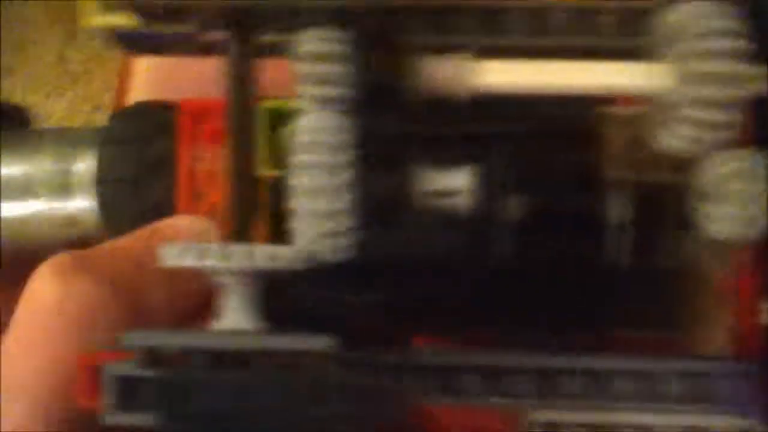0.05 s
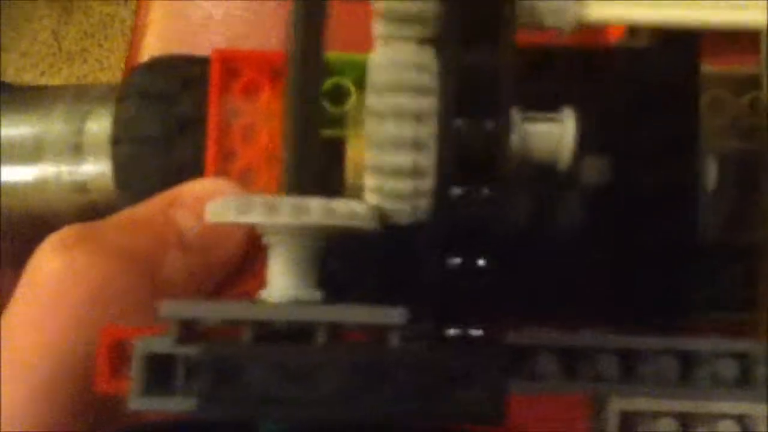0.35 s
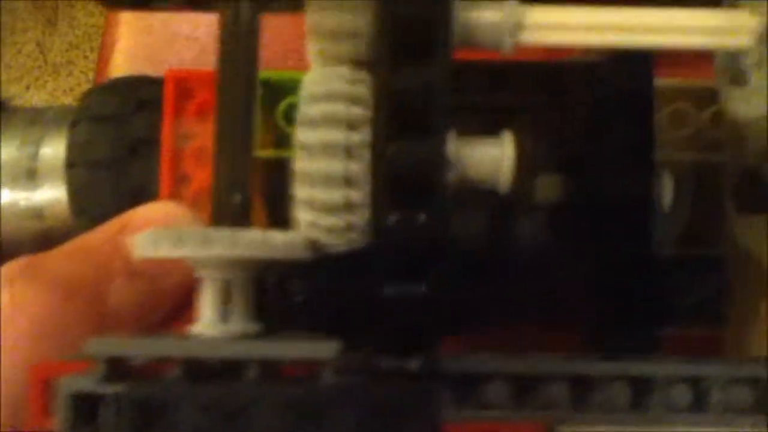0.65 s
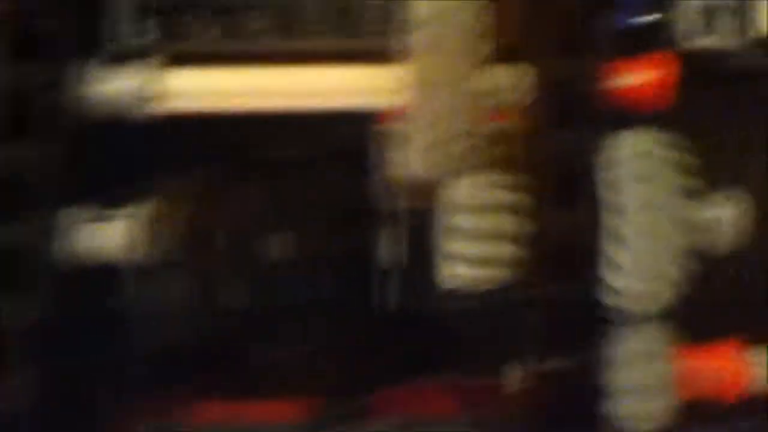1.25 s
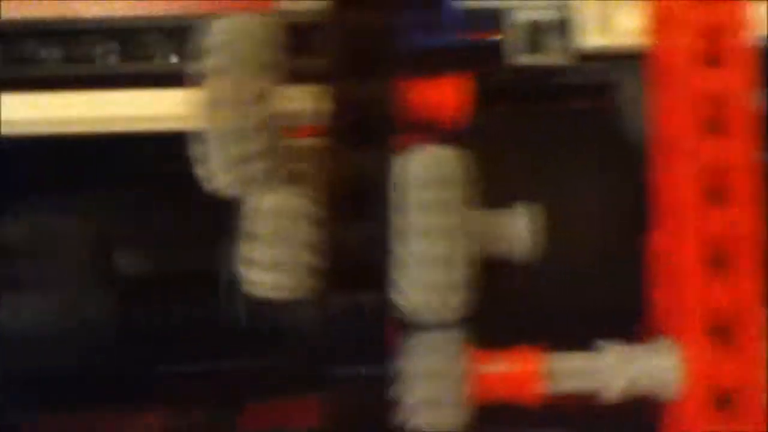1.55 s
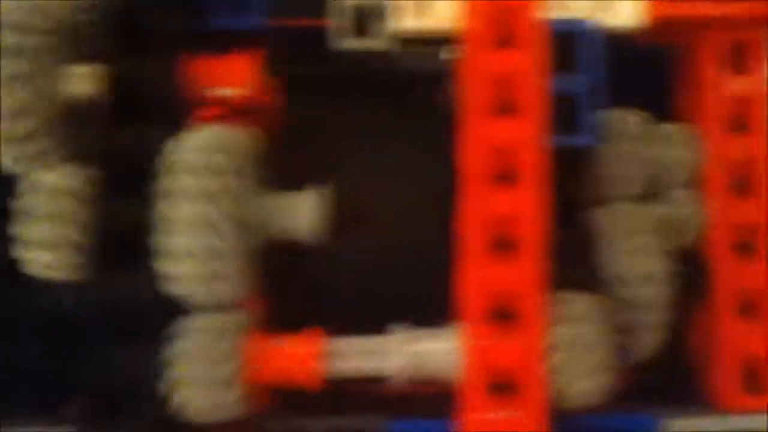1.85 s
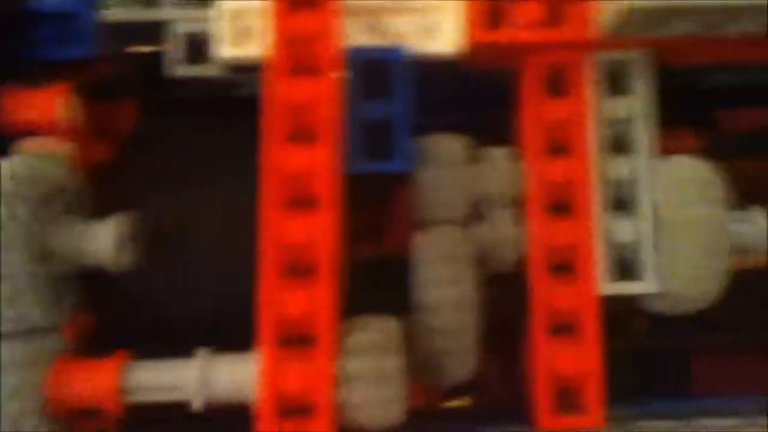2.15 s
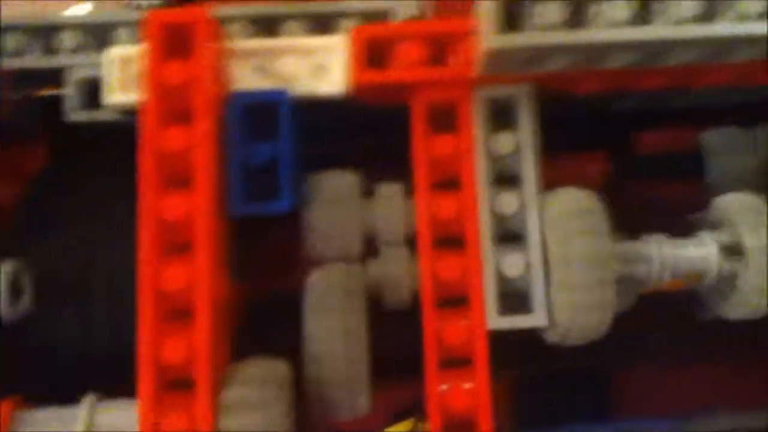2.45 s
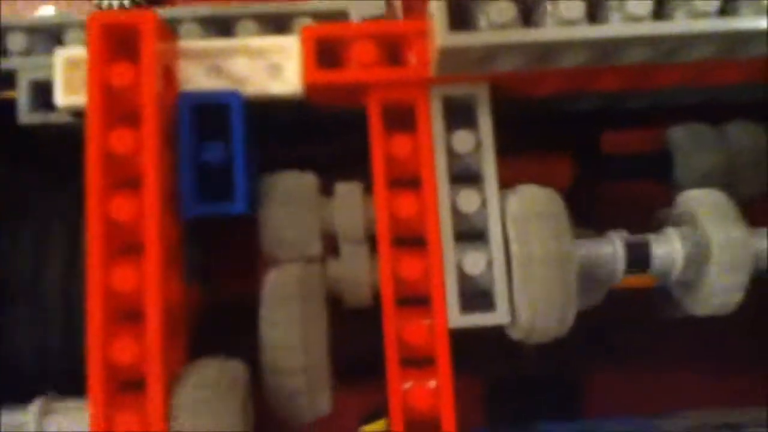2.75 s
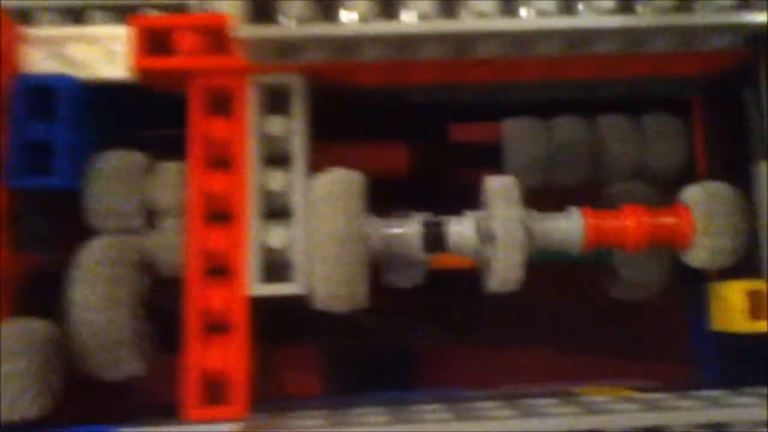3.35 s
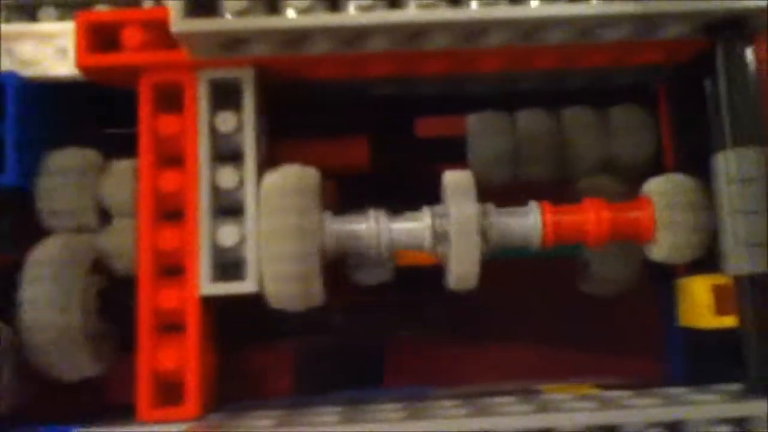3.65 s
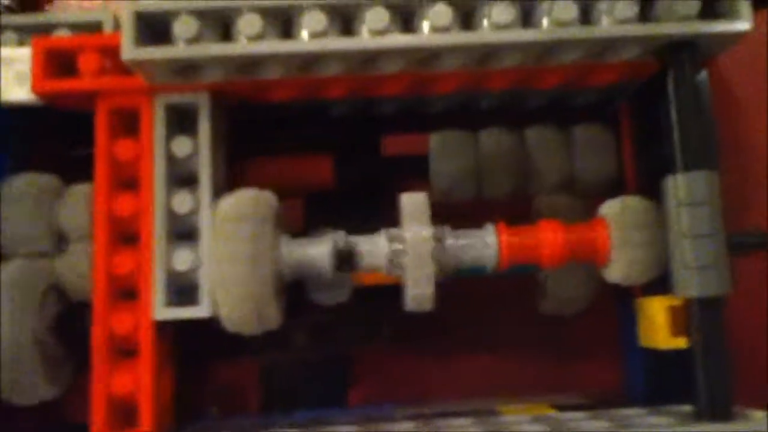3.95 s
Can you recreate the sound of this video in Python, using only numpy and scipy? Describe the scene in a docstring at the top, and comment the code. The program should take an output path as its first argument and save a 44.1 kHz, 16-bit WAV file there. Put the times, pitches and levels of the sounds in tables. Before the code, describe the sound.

A small plastic engine powered by suction clatters rapidly throughout, mixing throbbing, rushing air, bright hiss and gear chatter with an occasional skipped tooth. Heard close in a small room, it swells as the microphone travels from intake to gears.

```python
"""Toy brick vacuum engine

A vacuum-driven engine of plastic bricks spins about 24 times a second and turns a train of gears.
Each turn brings an air thump, two gulps of rushing air and a few piston knocks; gear teeth click,
ring and sometimes skip over the suction hiss. The microphone travels along the chassis from the
intake to the gearbox, and the roar grows louder and fuller."""
import sys
import numpy as np
from scipy import signal
from scipy.fft import rfft, irfft
from scipy.io import wavfile
from scipy.ndimage import uniform_filter1d, minimum_filter1d

SR = 44100
rng = np.random.default_rng(int(sys.argv[2]) if len(sys.argv) > 2 else 0)


def pcm_store(signal):
    """Save signal as 16-bit PCM."""
    levels = np.round(np.clip(np.atleast_2d(signal), -1, 1) * 32767)
    wavfile.write(sys.argv[1], SR, levels.astype(np.int16).T)


N = 176400
T = np.arange(N) / SR


# The gulps of air in one turn. Each row: place in turns, width in turns, strength.
AIR_GULPS = [(.11, 0.085, 0.7), (.62, 0.075, 0.75)]

def airflow(turns, floor=.36, grit=.22):
    """Turbulent air, with a share of rattle as grit, swells above a steady floor at each gulp."""
    gulps = sum(strength * np.exp(-.5 * (((turns - place + .5) % 1 - .5) / width) ** 2)
                for place, width, strength in AIR_GULPS)
    turbulence = np.sqrt(1 - grit) * rng.standard_normal(N) + np.sqrt(grit) * rattle()
    flutter = amp(.5 * drift(rate_hz=6.3))
    return turbulence * np.sqrt(floor + gulps) * flutter


# The roar's EQ at the intake and over the gearbox. Each row: frequency in Hz, gain in dB.
ROAR_INTAKE_EQ = [(25, -28), (70, -6), (160, -0.5), (260, 0), (450, 1), (600, 2), (800, 3.5), (1100, 1),
                  (1420, -4.5), (1800, 0), (2400, -7), (3200, -2.5), (4500, -8.5), (6000, -1), (12000, -21),
                  (15000, -42)]
ROAR_GEARBOX_EQ = [(25, -26), (70, -12), (170, -10.5), (280, -5), (480, -3.5), (740, 0), (1100, -0.5),
                   (1500, 2), (2100, -2), (3100, -2.5), (3700, -5.5), (5250, -10.5), (6100, -9),
                   (7200, -7.5), (12000, -37), (15000, -58)]

def air_roar(turns, travel):
    """Air rushes through the chassis in two gulps a turn."""
    return amp(3) * crossfade_eq(airflow(turns), travel, ROAR_INTAKE_EQ, ROAR_GEARBOX_EQ)


# The hiss's EQ at the intake and over the gearbox. Each row: frequency in Hz, gain in dB.
HISS_INTAKE_EQ = [(100, -18), (1500, -8.5), (3300, -0.5), (3700, -0.5), (4250, 1.5), (5500, 0.5),
                  (6300, -4.5), (7250, -4.5), (7900, -1), (8600, -7.5), (9600, -3.5), (10600, -3),
                  (12400, -9.5), (13000, -18), (14200, -14), (15500, -36)]
HISS_GEARBOX_EQ = [(100, -20), (1500, -5), (3300, -4.5), (3850, -1.5), (4400, -2), (4850, -1), (5400, -2),
                   (6200, -3), (7100, 1), (7950, 0), (8500, -1), (9400, 0), (10450, -7.5), (11300, -4.5),
                   (11950, -5.5), (12900, -21), (14000, -16), (14900, -50)]

def suction_hiss(turns, travel):
    """Suction draws a bright, flickering hiss that barely pulses with the gulps."""
    hiss = crossfade_eq(airflow(turns, floor=23, grit=.35), travel, HISS_INTAKE_EQ, HISS_GEARBOX_EQ)
    return hiss * amp(-.5 + 1.3 * drift(rate_hz=79))


# The piston's blows. Each row: place in turns, accent in dB at the intake and over the gearbox.
PISTON_HITS = [(.03, -8, 0), (.115, -9, 0), (.175, 3, -4), (.215, -3, 2), (.365, 3.5, -7), (.43, 2.5, -1.5),
               (.52, -14, -4), (.675, -9, 1.5)]
# The ring of the bricks along the chassis. Each row: time in seconds, pitch in Hz.
BRICK_RING = [(0, 2300), (.9, 2330), (1.25, 2500), (1.95, 2540), (2.3, 2940), (3.0, 2980), (4, 3060)]

def piston_knocks(turns, travel):
    """Piston and valve hit their stops; the blows and the meshing gears ring the loose bricks."""
    hits, ring_hz = strikes(turns, travel, PISTON_HITS), curve(BRICK_RING)
    body = unit(resonate(hits, ring_hz * (1 + .01 * drift(rate_hz=40)), width_hz=280))
    crack = colour(hits, [(60, -10), (300, -1), (1500, 4), (5500, -13), (11000, -11), (13500, -47)])
    mesh = unit(resonate(airflow(turns, floor=.15, grit=.9), ring_hz, width_hz=220))
    return body + amp(-18) * crack + amp(-7) * travel * mesh


# The tooth clicks. Each row: place in turns, accent in dB at the intake and over the gearbox.
TOOTH_HITS = [(.09, -5, -4), (.18, -1, -1.5), (.55, -4, -1.5), (.62, 1, 1.5), (.69, -8, -6), (.92, -8, -6)]
# The main ring of the teeth. Each row: time in seconds, pitch in Hz, relative level in dB.
TOOTH_RING = [(0, 4750, -6.5), (.8, 4650, -6.5), (1.25, 5250, -6.5), (1.7, 5220, -6), (2.2, 5300, -7),
              (2.8, 5300, -5.5), (3.3, 5370, -9), (4, 5370, -15)]

def gear_chatter(turns, travel):
    """Gear teeth click as the load comes on and sound two bright rings."""
    wander = np.interp(travel, [0, 1], [.04, .008])  # pitch strays less where the gears sit tight
    main = resonate(strikes(turns, travel, TOOTH_HITS),
                    curve(TOOTH_RING) * (1 + wander * drift(rate_hz=20)), width_hz=250)
    upper = resonate(strikes(turns, travel, TOOTH_HITS),
                     7050 * (1 + .5 * wander * drift(rate_hz=21)), width_hz=400)
    return amp(curve(TOOTH_RING, column=2) - 2.5) * unit(main) + amp(-10) * plastic_frame(upper)


# The skipping teeth. Each row: start in seconds, pitch in Hz, level in dB.
TOOTH_SKIPS = [(.351, 5100, -14), (.877, 5400, -12), (1.116, 5630, -13), (1.429, 5240, -19),
               (2.566, 5250, -8), (2.856, 5230, -9), (3.592, 5400, -8)]

def gear_skips(attack_s=.001, t60_s=.025):
    """Now and then a tooth jumps and its gear rings with a short rasp."""
    out, t = np.zeros(N), T[:SR // 10]
    for start, hz, db in TOOTH_SKIPS:
        rasp = unit(uniform_filter1d(rng.standard_normal(len(t)), size=40))
        envelope = np.minimum(t / attack_s, 1) * amp(db - 60 * t / t60_s)
        out[round(start * SR):][:len(t)] += envelope * sine(hz * (1 + .04 * rasp))
    return out


# The thump's harmonics. Each row: multiple of the crank speed, relative level in dB.
THUMP_HARMONICS = [(2, -16.5), (3, -15), (4, -6.5), (5, -4), (6, 1), (7, -13), (8, -14.5), (9, -19.5),
                   (11, -12), (14, -12.5)]

def air_thump(turns, place=.449):
    """One low pressure pulse per turn, where the harmonics of the crank line up."""
    phase = 2 * np.pi * (turns - place)
    return unit(sum(amp(db + .3 * drift(rate_hz=6.2)) * np.cos(multiple * phase)
                    for multiple, db in THUMP_HARMONICS))


# The hollows between the bricks. Each row: pitch in Hz, width in Hz, relative level in dB,
# closest moment in seconds, swell time in seconds.
CAVITY_TONES = [(355, 68, -14.5, 2.8, 3.9), (606, 42, -13.5, 1.4, 3), (738, 62, -11.5, 2.4, 2),
                (837, 39, -13, 3.2, 1.2), (1054, 84, -14.5, 1.6, 2), (1330, 220, -10.5, 3, 1.7),
                (1540, 180, -7.5, 4.1, .35), (1590, 140, -11.5, 1.2, 1.8), (1900, 350, -8.5, .3, 0.82),
                (2570, 280, -9.5, 3.1, 1.2), (3700, 200, -5, 3.9, 0.45), (4276, 200, -10, 1.5, 4.6)]

def cavities(turns):
    """Cavities ring in the air stream, each loudest as the microphone passes it."""
    out = np.zeros(N)
    for hz, width_hz, db, closest_s, swell_s in CAVITY_TONES:
        nearness = np.exp(-.5 * ((T - closest_s) / swell_s) ** 2)
        out += amp(db) * nearness * unit(resonate(airflow(turns), np.full(N, hz), width_hz))
    return out


def rattle(ticks_per_s=1700, spread_db=3.5):
    """Loose gear teeth tick at random and ring the plastic frame."""
    ticks = amp(spread_db * np.minimum(rng.exponential(1, N), 4)) * rng.choice([-1, 1], N)
    return plastic_frame(ticks * (rng.random(N) < ticks_per_s / SR))


def plastic_frame(x):
    """The frame rings briefly after each tick; the result has rms 1."""
    return unit(add_tail(x, t60_s=.052, wet_db=2.5))


# The faint bed of whines. Each row: pitch in Hz, level in dB.
WHINE_TONES = [(1814, -41.5), (3326, -42), (6977, -45)]

def suction_whine(waver_hz=4.12):
    """The suction motor and the air path sing thin, wavering tones."""
    return sum(amp(db) * np.sqrt(2) * sine(hz + waver_hz * drift(rate_hz=7)) for hz, db in WHINE_TONES)


def strikes(turns, travel, pattern, bounce_s=.0013, buzz_t60_s=.01):
    """Blows recur in every turn, a little uneven; each bounces twice and leaves a short buzz."""
    clicks, cycles = np.zeros(N), np.arange(int(turns[-1]) + 1)
    for place, intake_db, gearbox_db in pattern:
        late, force, gap = rng.standard_normal((len(cycles), 3)).T
        start = np.interp(cycles + place + .01 * late, turns, T, right=N)
        for bounce in range(3):
            at = ((start + bounce * bounce_s * np.exp(.5 * gap)) * SR).astype(int)
            at, spread_db = at[at < N], 1.1 * force[at < N]
            accent_db = intake_db + (gearbox_db - intake_db) * travel[at]
            clicks[at] += amp(accent_db + spread_db - 10 * bounce)
    decay = np.exp(-2 * np.log(1000) / (buzz_t60_s * SR))
    buzz = np.sqrt(signal.lfilter([1 - decay], [1, -decay], clicks ** 2)) * rng.standard_normal(N)
    return clicks + amp(-6) * buzz


def amp(db):
    """Decibels to gain."""
    return 10 ** (np.asarray(db) / 20)


def unit(x):
    """Scales to rms 1."""
    return x / np.sqrt(np.mean(x ** 2) + 1e-20)


def sine(hz):
    """A sine that follows the curve hz."""
    return np.sin(2 * np.pi * np.cumsum(hz) / SR)


def curve(rows, column=1):
    """One column of a timed table, at every sample."""
    rows = np.array(rows)
    return np.interp(T, rows[:, 0], rows[:, column])


def drift(rate_hz):
    """Smooth random motion of rms 1."""
    hz = np.fft.rfftfreq(N, 1 / SR)
    return unit(irfft(rfft(rng.standard_normal(N)) / (1 + (hz / rate_hz) ** 4), N))


def colour(x, eq):
    """Shapes x with an EQ of (Hz, dB) points, at rms 1."""
    hz, db = np.transpose(sorted(eq))
    gain = amp(np.interp(np.log(np.fft.rfftfreq(N, 1 / SR) + 1), np.log(hz), db))
    return unit(irfft(rfft(x) * gain, N))


def crossfade_eq(x, travel, intake_eq, gearbox_eq):
    """The colour of the air noise shifts as the microphone moves."""
    return (1 - travel) * colour(x, intake_eq) + travel * colour(x, gearbox_eq)


def resonate(x, hz, width_hz):
    """A steep resonance that follows the curve hz."""
    carrier = np.exp(2j * np.pi * np.cumsum(hz) / SR)
    pole = np.exp(-2 * np.pi * width_hz / SR)
    envelope = signal.lfilter([(1 - pole) ** 2], [1, -2 * pole, pole * pole], x / carrier + 1e-18)
    return 2 * (carrier * envelope).real


def add_tail(x, t60_s, wet_db):
    """Adds a dense dying tail."""
    t = T[:SR // 2]
    tail = rng.standard_normal(len(t)) * np.exp(-np.log(1000) * t / t60_s)
    wet = signal.fftconvolve(x, tail / np.linalg.norm(tail))[:N]
    return (x + amp(wet_db) * wet) / np.hypot(1, amp(wet_db))


# The crank's pace. Each row: time in seconds, speed in turns per second.
CRANK_SPEED = [(0.0, 24.12), (0.4, 25.08), (0.7, 24.22), (1.0, 25.06), (1.3, 24.29), (1.6, 24.29),
               (1.9, 23.99), (2.15, 23.89), (2.4, 24.17), (2.65, 24.01), (2.9, 24.24), (3.3, 24.69),
               (3.65, 24.23), (4.0, 24.7)]
# The microphone's move. Each row: time in seconds, position from 0 (intake) to 1 (gearbox).
MIC_PATH = [(0, 0.), (.7, 0), (1.4, 0.23), (2.0, 0.48), (2.5, 0.85), (4, 0.94)]
# The fader rides. Each row: time in seconds, then gain in dB for thump, roar, knocks and treble.
FADERS = [(0.0, -41, -33, -28.5, -25.5), (0.22, -43, -31.5, -28.5, -26.0), (0.45, -38.5, -31.5, -27, -24.5),
          (0.66, -36.0, -29.5, -26.5, -21.5), (1.0, -39.5, -30.5, -26.5, -23), (1.22, -36, -26.5, -23, -21),
          (1.52, -33.5, -26.5, -23, -19.5), (1.72, -33, -24, -20.5, -19.5), (1.97, -34, -24, -20, -20.5),
          (2.08, -37, -23, -21, -18), (2.18, -34.5, -24.5, -22.5, -20), (2.33, -30.5, -22, -17, -18.5),
          (2.65, -32, -22.5, -19.5, -17.5), (2.86, -32, -22, -18.5, -17.5), (3.0, -32, -21.5, -19, -18.5),
          (3.25, -29.5, -19.5, -17, -16.5), (3.65, -31, -19.5, -16.5, -17), (4.0, -33, -19, -16.5, -15.5)]

def scene():
    """The crank paces air, piston and gears over a faint whine, in a small room, heard in mono."""
    turns, travel = np.cumsum(curve(CRANK_SPEED)) / SR, curve(MIC_PATH)
    thump = amp(curve(FADERS, column=1) - .15) * air_thump(turns)
    air, hiss = air_roar(turns, travel), suction_hiss(turns, travel)
    roar = amp(curve(FADERS, column=2)) * (air + cavities(turns))
    knocks = amp(curve(FADERS, column=3) - 4) * piston_knocks(turns, travel)
    treble = amp(curve(FADERS, column=4)) * (hiss + gear_chatter(turns, travel))
    whine = suction_whine()
    in_room = add_tail(roar + knocks + treble + gear_skips(), t60_s=.16, wet_db=-18)
    mono = thump + whine + in_room
    return np.array([mono, mono])


def record(dry, ceiling=.85, window_s=.003, cutoff_hz=15600):
    """A quick limiter holds the peaks under full scale; a low-pass trims the very top."""
    size = int(window_s * SR)
    needed = ceiling / np.maximum(abs(dry).max(0), ceiling)
    gain = uniform_filter1d(minimum_filter1d(needed, size), size)
    lowpass = signal.firwin(511, cutoff_hz, window=("kaiser", 9), fs=SR)
    return signal.oaconvolve(dry * gain, lowpass[None], "same")


dry = scene()
out = record(dry)
pcm_store(out)
```